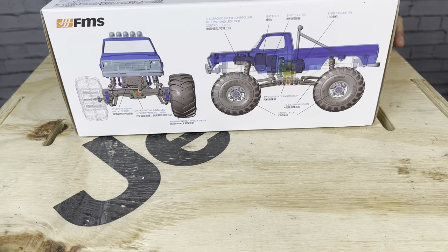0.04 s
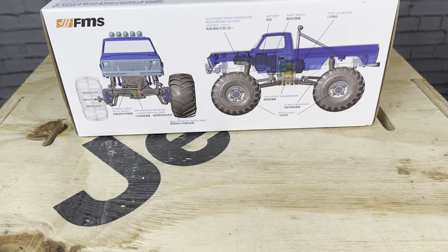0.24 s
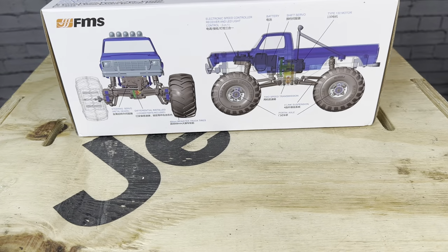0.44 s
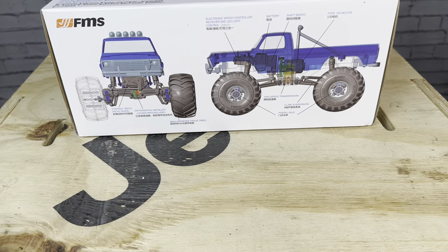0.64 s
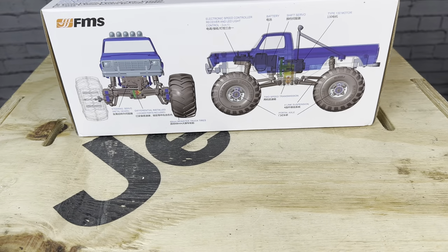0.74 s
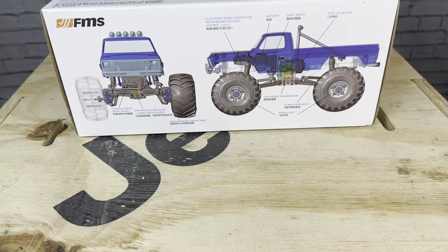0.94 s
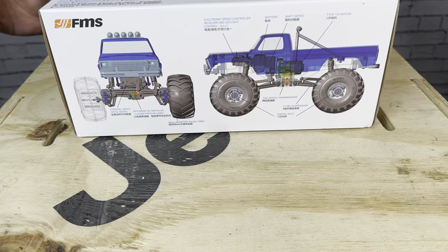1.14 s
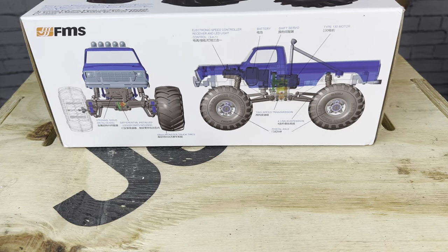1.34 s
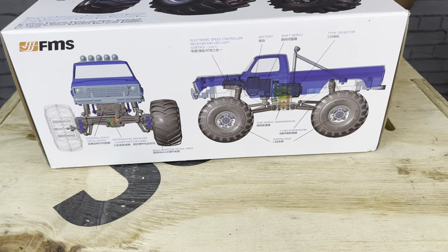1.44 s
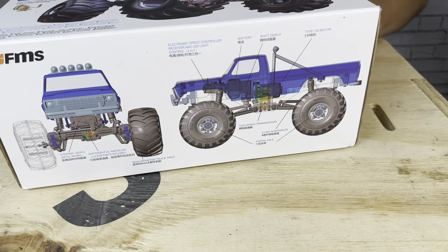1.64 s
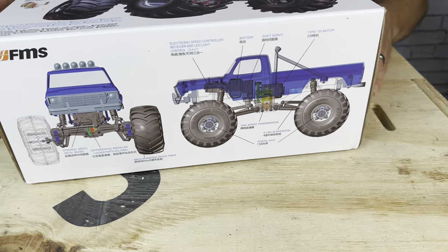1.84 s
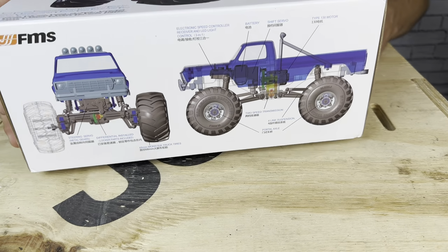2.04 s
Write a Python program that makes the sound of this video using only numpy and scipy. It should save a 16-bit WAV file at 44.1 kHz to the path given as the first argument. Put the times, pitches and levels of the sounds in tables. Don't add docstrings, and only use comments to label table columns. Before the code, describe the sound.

A cardboard box is dragged over a wooden table, close-miked in a quiet, dry room. From 0 to 0.95 s, only faint finger rubs, soft taps and tiny creaks. Near 1 s a thin squeak and hissy palm slip, then a small nudge. Loud hollow grinding shoves from 1.2 and 1.45 s, with a deep knock at 1.3 and sharp cracks around 1.5; a weaker push at 1.65, a last scrape at 1.9, low thumps beneath.

```python
import sys
import numpy as np
from scipy import signal
from scipy.fft import rfft, irfft, next_fast_len
from scipy.io import wavfile

SR = 44100
rng = np.random.default_rng(int(sys.argv[2]) if len(sys.argv) > 2 else 0)


def waveform_to_disk(signal):
    frames = np.transpose(np.atleast_2d(signal))
    scaled = np.clip(frames, -1, 1) * 32767
    samples = np.round(scaled).astype(np.int16)
    wavfile.write(sys.argv[1], SR, samples)


def to_linear_factor(level_db):
    exponent = np.asarray(level_db, float) / 20
    return 10 ** exponent


N = 92257
TIME = np.arange(N) / SR

# pitch in Hz, level in dB, t60 in seconds.
BOX_MODES = [(244, 6.5, 0.042), (354.5, 1, 0.072), (586, 3, 0.059), (638.4, 3.5, 0.056), (820, -19, 0.036),
             (975, -7.5, 0.066), (1340, -4.5, 0.016), (1390, -11, 0.063), (1540, -22, 0.049),
             (1847, -14, 0.065), (2750, -38, 0.09), (3056, -20, 0.041)]
# pitch in Hz, level in dB, t60 in seconds.
WALL_MODES = [(200, 6.5, 0.065), (250, 0, .1), (384, -1.5, 0.097), (618, 0.5, 0.1), (766, -0.5, 0.11),
              (830, -1.5, 0.16), (1444, -4.5, 0.077), (1800, -16, 0.047), (2600, -11, 0.044)]


def rms_one(x):
    return x / np.sqrt(np.mean(x ** 2) + 1e-20)


def in_time(rows):
    s, *columns = np.transpose(rows)
    return [np.interp(TIME, s, column, left=-150, right=-150) for column in columns]


def drift(rate):
    r = np.exp(-2 * np.pi * rate * 20 / SR)
    noise = rng.standard_normal(N // 20 + 2002)
    slow = signal.lfilter([1], [1, -2 * r, r * r], noise)[2000:]
    return np.interp(np.arange(N) / 20, np.arange(len(slow)), rms_one(slow))


def colour(x, points):
    hz, db = np.transpose(points)
    log_hz = np.log(np.maximum(np.arange(N // 2 + 1) * SR / N, 1))
    gain = to_linear_factor(np.interp(log_hz, np.log(hz), db, left=-120))
    return rms_one(irfft(rfft(x) * gain, N))


def ring(x, modes):
    out = 0
    for k, (hz, db, t60) in enumerate(modes):
        r = to_linear_factor(-60 / (t60 * SR))
        w = 2 * np.pi * hz / SR
        mode = signal.lfilter([0, to_linear_factor(db) * np.sin(w)], [1, -2 * r * np.cos(w), r * r], x + 1e-18)
        out = out + (-1) ** k * mode
    return out


def grains(per_s, spread_db, clump_db):
    size = to_linear_factor(spread_db * np.minimum(rng.exponential(1, N), 5)) * rng.choice([-1, 1], N)
    chance = per_s * to_linear_factor(clump_db * drift(60.0)) / SR
    return rms_one(size * (rng.random(N) < chance))


def patchy(x, patch_db, rate):
    size = next_fast_len(N)
    edges = np.geomspace(100, SR / 2, num=44)
    spectrum, out = rfft(x, size), 0
    band = np.searchsorted(edges, np.arange(len(spectrum)) * SR / size)
    for k in range(len(edges) + 1):
        out = out + to_linear_factor(patch_db * drift(rate)) * irfft(spectrum * (band == k), size)[:N]
    return rms_one(out)


def strike(s, db, modes, damping, uneven_db):
    luck, out = rng.normal(0, 1, (len(s), len(modes), 2)), 0
    for k, (hz, level_db, t60) in enumerate(modes):
        clicks = np.zeros(N)
        clicks[(s * SR).astype(int)] = to_linear_factor(db + uneven_db * luck[:, k, 0]) * np.sign(luck[:, k, 1])
        out = out + ring(clicks, [(hz, 0.5 * level_db, damping * t60)])
    return out


def soft_contact(x):
    return signal.sosfilt(signal.butter(1, 2600, fs=SR, output="sos"), x)


def drag():
    # time in seconds, pressure in dB, dry rasp over body in dB.
    shove_tables = [
        [(1.06, -72, 10), (1.08, -49, 2.5), (1.096, -55.5, 6.5), (1.124, -38.5, -13), (1.145, -55, 2.5),
         (1.17, -79, 22)],
        [(1.18, -48, -8), (1.2, -43, -8), (1.232, -32, -14.5), (1.25, -32.5, -13), (1.266, -30, -14.5),
         (1.285, -37.5, -7), (1.33, -34.5, -12.5), (1.352, -43, -3.5), (1.41, -54.5, 4.5)],
        [(1.41, -50.5, -0.5), (1.442, -42.5, -4), (1.504, -36, -9.5), (1.53, -31, -10.5), (1.568, -30.5, -13),
         (1.594, -44, -8.5), (1.62, -64, 9)],
        [(1.62, -53.5, 3.5), (1.66, -37.5, -12.5), (1.762, -50, -4), (1.804, -52.5, -6), (1.83, -67, -12),
         (1.858, -59, -8)],
        [(1.86, -48.5, -23), (1.88, -42, -10), (1.908, -33.5, -10), (1.94, -34.5, -12), (1.952, -43.5, -4.5),
         (1.974, -39.5, -18.5), (2.026, -53, 2.5), (2.09, -49.5, -5)],
    ]
    # frequency in Hz, level in dB per Hz.
    body_colour = [(60, -3), (245, -13), (420, -5.5), (655, 0), (885, -5.5), (1930, -9.5), (4000, -38),
                   (8000, -58)]
    # frequency in Hz, level in dB per Hz.
    rasp_colour = [(1500, -11.5), (2500, -2), (5000, -1), (7550, 0), (8800, -4), (15900, -14)]
    shoves = [in_time(rows) for rows in shove_tables]
    force = sum(to_linear_factor(db) for db, over_db in shoves)
    rasp = sum(to_linear_factor(db + over_db) for db, over_db in shoves)

    catches = grains(per_s=3000, spread_db=2.5, clump_db=2.0)
    body = to_linear_factor(-1.0) * colour(catches, body_colour) + to_linear_factor(-2.5) * rms_one(ring(catches, BOX_MODES))
    body = patchy(body, patch_db=1.8, rate=18.0)
    fine_catches = grains(per_s=13000, spread_db=1.5, clump_db=3.5)
    grit = patchy(colour(0.75 * catches + fine_catches, rasp_colour), patch_db=2.0, rate=15.0)

    dull = signal.sosfiltfilt(signal.butter(2, 8060, fs=SR, output="sos"), grit)
    grit = dull + (grit - dull) * np.sqrt(np.clip(force / to_linear_factor(-55), 0, 1))
    return force * to_linear_factor(1.07 * drift(17.0)) * body + to_linear_factor(1.5) * rasp * grit


def edge_knocks():
    # time in seconds, body level in dB, snap level in dB.
    knock_rows = [
        (0.996, -42, -49),
        (1.078, -34, -42),
        (1.1801, -25.5, -36),
        (1.3005, -21, -33),
        (1.5145, -21, -30),
        (1.3076, -16.5, -52),
        (1.562, -39, -44),
        (1.863, -49, -62),
        (1.938, -36, -30),
    ]
    # pitch in Hz, level in dB, t60 in seconds.
    snap_modes = [(3360, -8, 0.0032), (5570, 9, 0.0023), (7600, -16, 0.0056), (9800, -19, 0.006)]
    s, body_db, snap_db = np.transpose(knock_rows)
    body = soft_contact(strike(s, body_db - 12, BOX_MODES[1:], damping=0.3, uneven_db=2.0))
    return body + strike(s, snap_db + 1, snap_modes, damping=0.7, uneven_db=1.5)


def thumps():
    # time in seconds, peak in dB, pitch in Hz, t60 in seconds.
    thump_rows = [(0.996, -30.5, 71, 0.11), (1.075, -21.5, 89, 0.025), (1.178, -16, 35.5, 0.064),
                  (1.257, -23.5, 645, 0.098), (1.2935, -18, 178, 0.048), (1.2995, -21, 228, 0.098),
                  (1.303, -24.5, 47, 0.15), (1.314, -24, 100, 0.07), (1.599, -41, 61, 0.053),
                  (1.885, -29, 120, 0.046), (1.915, -27, 53, 0.091), (2.05, -37.5, 121, 0.068),
                  (1.155, -42, 30, 0.035), (1.106, -36, 95, 0.059), (1.217, -33.5, 490, 0.2),
                  (1.434, -39.5, 640, 0.15), (1.48, -32, 675, 0.15), (1.516, -30, 795, 0.13),
                  (1.537, -34, 640, 0.079), (1.651, -37, 650, 0.12), (1.883, -38, 720, .05),
                  (1.934, -27, 565, 0.031), (1.959, -28.5, 640, 0.066), (1.969, -34, 650, 0.09),
                  (1.997, -38, 920, 0.064), (1.918, -22, 116, .05), (1.32, -31, 60, .06),
                  (0.54, -53.5, 673, .05), (2.3, -42, 185, .08), (1.747, -42.5, 480, 0.065),
                  (1.2, -48, 270, 0.037), (0.55, -57, 90, 0.084)]
    out = 0
    for s, db, hz, t60 in thump_rows:
        blow = (np.arange(N) == int(s * SR)) + 1e-18
        soft_blow = signal.lfilter(*signal.butter(3, 5 * hz, fs=SR), blow)
        out = out + ring(soft_blow, [(hz, db, t60)])
    return out


def fibre_ticks():
    # time in seconds, peak in dB, pitch in Hz.
    tick_rows = [(.2475, -50.5, 1390), (.256, -61, 675), (.385, -53, 1870), (.411, -46.5, 2870),
                 (.416, -47, 1230), (.419, -51, 3880), (.551, -52, 2700), (.627, -44.5, 720),
                 (.672, -57, 2850), (1.018, -47, 1590), (1.119, -34.5, 1670), (1.121, -41, 656),
                 (1.2043, -44, 7040), (1.219, -36, 7000), (1.2225, -32, 1300), (1.2325, -31, 1030),
                 (1.26, -29, 2160), (1.2705, -27, 6200), (1.2715, -29.5, 3240), (1.3005, -27, 4450),
                 (1.301, -26, 2590), (1.3035, -18.5, 1256), (1.506, -34, 1750), (1.5148, -19.5, 10600),
                 (1.515, -23.5, 7600), (1.515, -21.5, 1050), (1.5285, -25, 7200), (1.532, -32, 6000),
                 (1.5445, -24, 5630), (1.5465, -29, 7800), (1.5525, -31, 5000), (1.554, -22, 1330),
                 (1.5555, -30, 7400), (1.5635, -23, 7500), (1.58, -33, 6740), (1.6757, -43, 3820),
                 (1.6812, -33, 5950), (1.871, -39.5, 3580), (1.894, -35, 5240), (1.905, -29.5, 700),
                 (1.922, -32, 7650), (1.9375, -27, 6700), (1.998, -47, 2900), (2.049, -41, 2300),
                 (2.067, -43, 2280)]
    out = 0
    for s, db, hz in tick_rows:
        t60 = 0.0015 + 20.0 / hz
        out = out + ring(np.arange(N) == int(s * SR), [(hz, db, t60)])
    return out


def palm_slip():
    # frequency in Hz, level in dB per Hz.
    palm_colour = [(250, -17), (1550, -20.5), (2700, -21), (4300, -11.5), (8340, -6), (15900, -9)]
    knots = 0.99 + np.cumsum([0, 0.0047, 0.094, 0.12])
    slip = to_linear_factor(np.interp(TIME, knots, [-40, -4.5, 0, -22], left=-150, right=-150))
    hiss = colour(grains(per_s=30000, spread_db=0.5, clump_db=1.0), palm_colour)
    hiss = patchy(hiss, patch_db=1.6, rate=21.0)
    dull = signal.sosfilt(signal.butter(2, 6930, fs=SR, output="sos"), hiss)
    slow = np.clip((TIME - 1.064) / 0.11, 0, 0.9)
    return to_linear_factor(-40) * slip * ((1 - slow) * hiss + slow * dull)


def skin_squeak():
    # pitch at the start in Hz, pitch at the end in Hz, level in dB.
    squeak_partials = [(3750, 4300, -77), (7500, 8600, -75), (9800, 11400, -78)]
    start_s, end_s = 0.95, 0.997
    progress = np.clip((TIME - start_s) / (end_s - start_s), 0, 1)
    swell = np.sqrt(progress) * (progress < 1)
    out = 0
    for from_hz, to_hz, db in squeak_partials:
        hz = (from_hz + (to_hz - from_hz) * progress) * (1 + 0.0036 * drift(150.0))
        tone = np.sin(2 * np.pi * np.cumsum(hz) / SR)
        out = out + to_linear_factor(db + 3.9 * drift(90.0)) * swell * tone
    return out


def print_creaks():
    # start in seconds, end in seconds, pitch in Hz, width in Hz, level in dB.
    creak_rows = [
        (.632, .662, 10100, 150, -79),
        (0.688, .77, 9300, 150, -83),
        (0.723, 1.01, 3900, 250, -82.5),
        (0.757, 1.007, 2020, 350, -78.5),
    ]
    out = 0
    for start, end, hz, width_hz, db in creak_rows:
        tone = rms_one(ring(rng.standard_normal(N), [(hz, 0, 2.0 / width_hz)]))
        fade = np.clip(np.minimum(TIME - start, end - TIME) / 0.0074, 0, 1)
        out = out + to_linear_factor(db) * fade * tone
    return out


def finger_rubs():
    # start in seconds, length in seconds, level in dB, hiss over wall in dB.
    rub_rows = [(-.03, 0.043, -59, -6.5), (0.029, 0.097, -68.5, -4), (0.125, 0.1, -65.5, -2.5),
                (.245, 0.025, -61, -6.5), (0.367, 0.029, -58, 1), (0.405, 0.015, -62.5, 4),
                (0.441, 0.12, -63.5, -1), (0.526, 0.04, -66, -3), (0.58, 0.057, -57.5, -7),
                (0.618, 0.021, -61.5, -0.5), (0.663, 0.019, -62, 3), (0.694, 0.071, -74, -4)]
    # frequency in Hz, level in dB per Hz.
    skin_colour = [(120, -33), (377, -5), (750, -4.5), (950, -8.5), (4750, -14), (10500, -22), (15900, -41)]
    rise_s, fall_db_per_s = 0.005, 454
    s, length, db, bright_db = np.transpose(rub_rows)[:, :, None]
    fall_db = fall_db_per_s * np.maximum(TIME - s - length, 0)
    shape = np.clip((TIME - s) / rise_s, 0, 1) * to_linear_factor(db - fall_db)
    rub = grains(per_s=12000, spread_db=1.0, clump_db=1.26)
    hiss = patchy(colour(rub, skin_colour), patch_db=2.5, rate=12.5)
    wall = rms_one(ring(rub, WALL_MODES))
    return (shape * to_linear_factor(bright_db)).sum(0) * to_linear_factor(-1) * hiss + shape.sum(0) * to_linear_factor(-4) * wall


def panel_hum():
    start_s, length_s = 0.016, 0.14
    swell = np.sin(np.pi * np.clip((TIME - start_s) / length_s, 0, 1))
    hz = 187 + 7.7 * drift(24.0)
    return to_linear_factor(-59.5) * swell * np.sin(2 * np.pi * np.cumsum(hz) / SR)


def fingertip_taps():
    # time in seconds, peak in dB.
    tap_rows = [
        (0.249, -58),
        (.363, -42),
        (.482, -52),
        (0.6128, -42),
    ]
    s, db = np.transpose(tap_rows)
    return soft_contact(strike(s, db - 7, WALL_MODES[3:], damping=0.25, uneven_db=1.5))


def room(x):
    t60_s, wall_cut_hz = 0.18, 3400
    size = next_fast_len(N + SR)
    w = 2 * np.pi * np.arange(size // 2 + 1) / size
    dull = 1 / (1 + 1j * w * SR / (2 * np.pi * wall_cut_hz))
    echoes = 0
    for k, delay_s in enumerate(rng.uniform(0.012, 0.035, size=8)):
        loop = to_linear_factor(-60 * delay_s / t60_s) * dull * np.exp(-1j * w * delay_s * SR)
        echoes = echoes + (-1) ** k * loop / (1 - loop)
    return irfft(rfft(x, size) * echoes, size)[:N]


def table_sway():
    # time in seconds, level in dB.
    sway_rows = [(0, -55), (.35, -54.5), (.66, -54), (.8, -56), (.97, -49.5), (1.1, -37.5), (1.16, -26.5),
                 (1.2, -31.5), (1.33, -28), (1.42, -32.5), (1.5, -39), (1.62, -25), (1.83, -38.5),
                 (1.92, -32), (2.0, -36.5), (2.09, -26)]
    # frequency in Hz, level in dB per Hz.
    sway_colour = [(4, -5.5), (8, 19.5), (17, -8.5), (43, -7.5), (160, -22), (300, -52)]
    db, = in_time(sway_rows)
    return to_linear_factor(db - 2.0 + 1.5 * drift(1.4)) * colour(rng.standard_normal(N), sway_colour)


def noise_floor():
    # frequency in Hz, level in dB per Hz.
    floor_colour = [(40, -21), (130, -23.5), (230, -18.5), (1550, -33.5), (3440, -36), (15900, -39.5)]
    return to_linear_factor(-71) * colour(rng.standard_normal(N), floor_colour)


def scene():
    box = drag() + edge_knocks() + thumps() + fibre_ticks()
    hands = palm_slip() + skin_squeak() + print_creaks() + finger_rubs() + panel_hum() + fingertip_taps()
    close = box + hands
    return (close + to_linear_factor(-20.5) * room(close) + table_sway() + noise_floor())[None]


def band_limit(x):
    return signal.sosfilt(signal.butter(12, 16010, fs=SR, output="sos"), x)


def record(dry):
    top_cut = signal.cheby2(14, 60, 16900, fs=SR, output="sos")
    mix = signal.sosfilt(top_cut, dry)
    return band_limit(mix)


dry = scene()
out = record(dry)
waveform_to_disk(out)
```